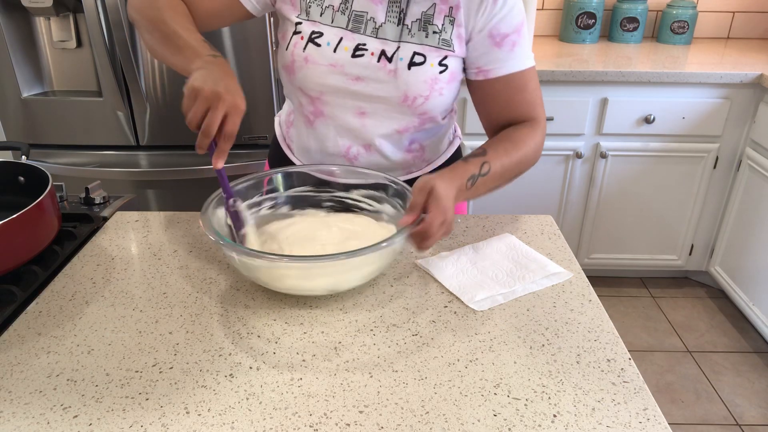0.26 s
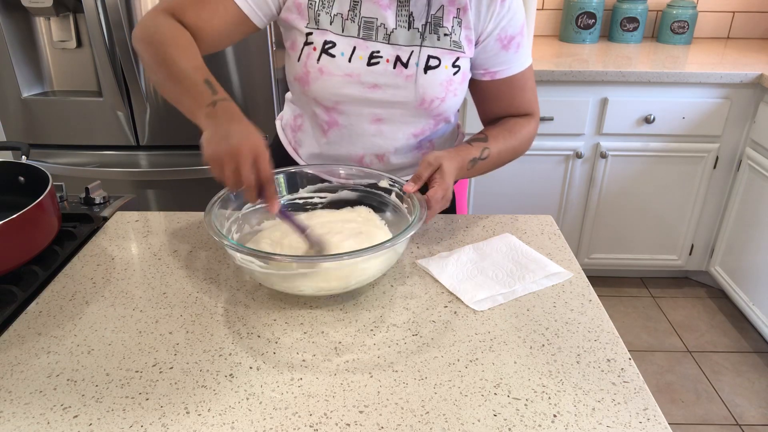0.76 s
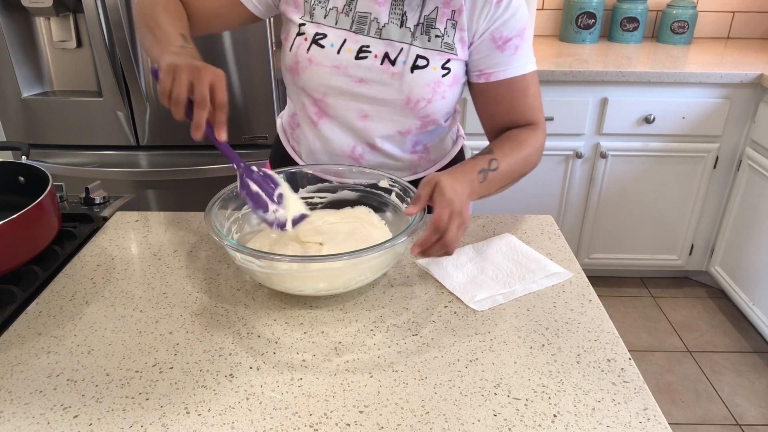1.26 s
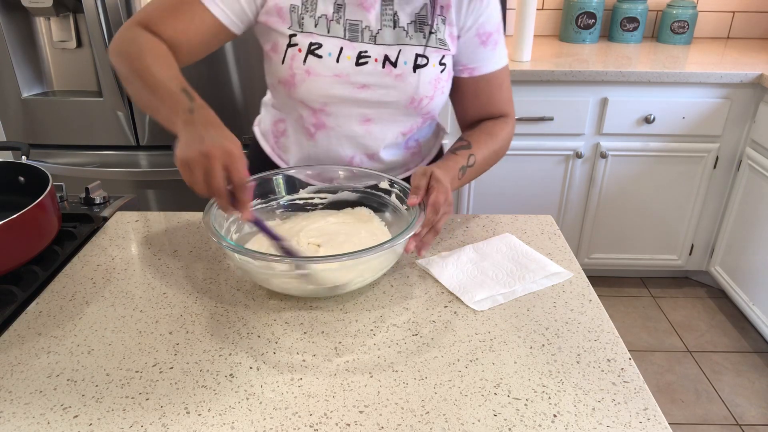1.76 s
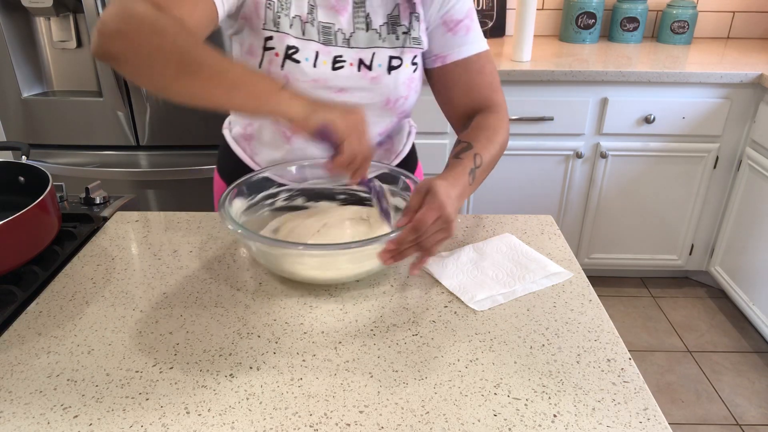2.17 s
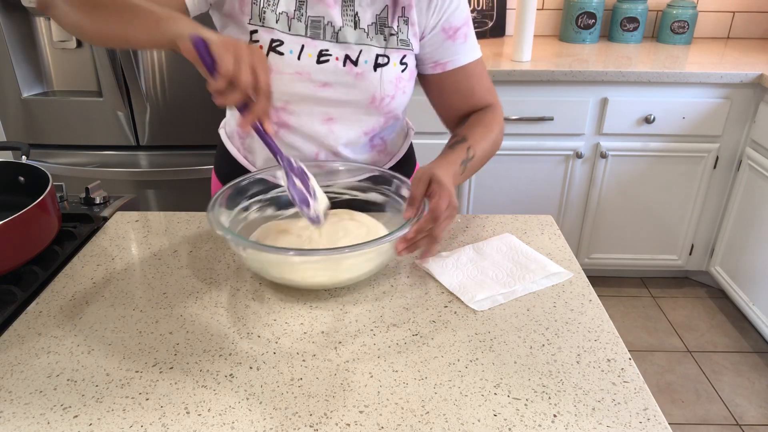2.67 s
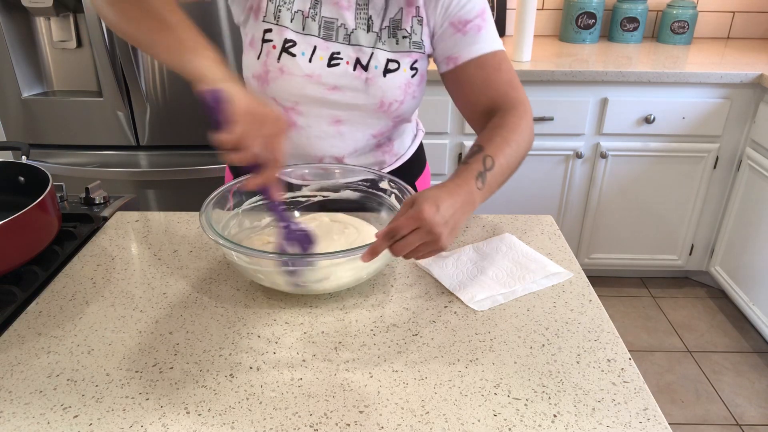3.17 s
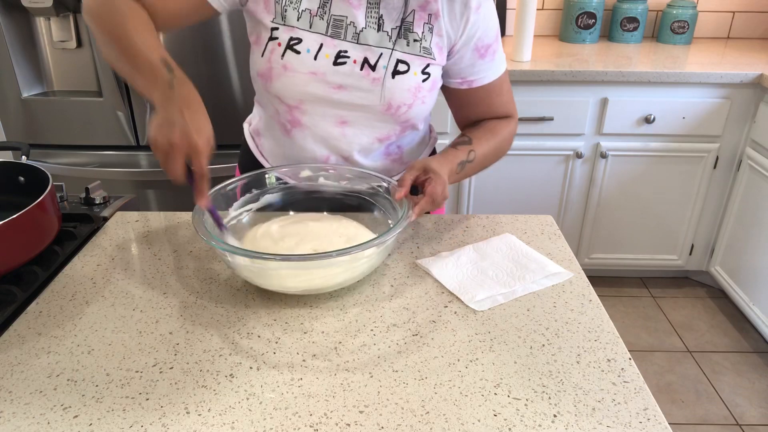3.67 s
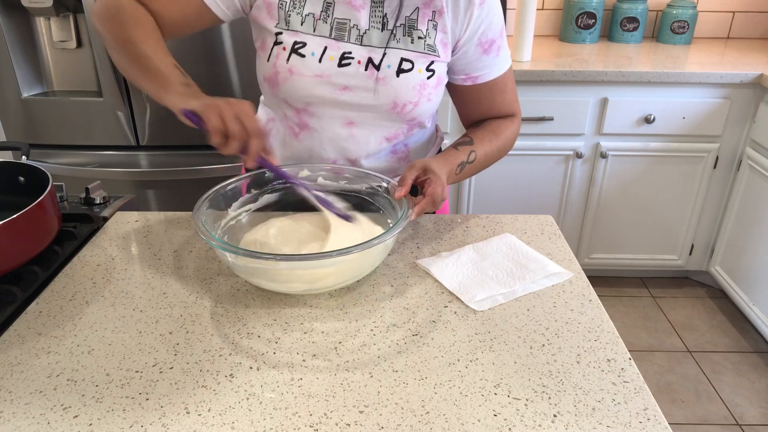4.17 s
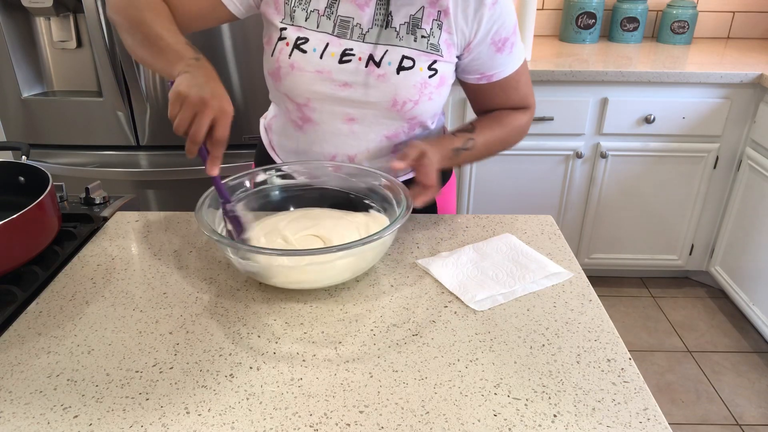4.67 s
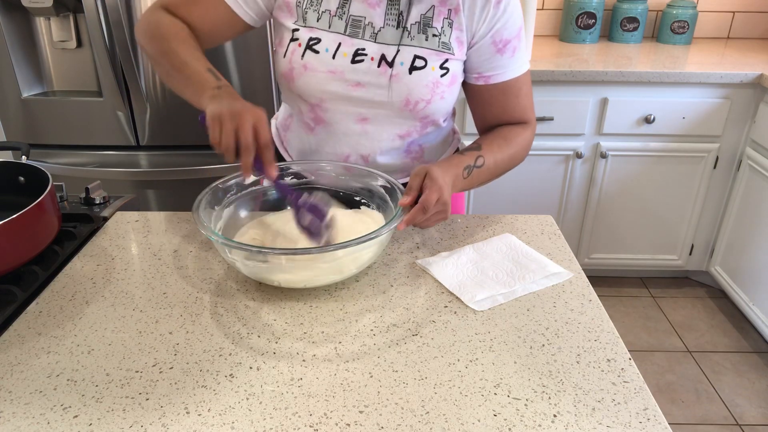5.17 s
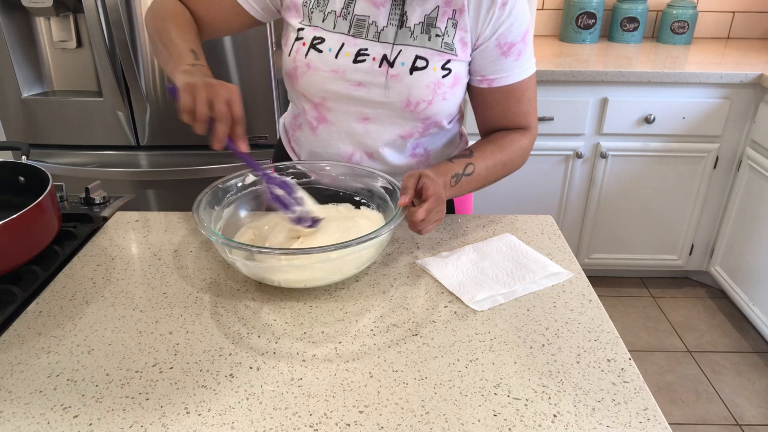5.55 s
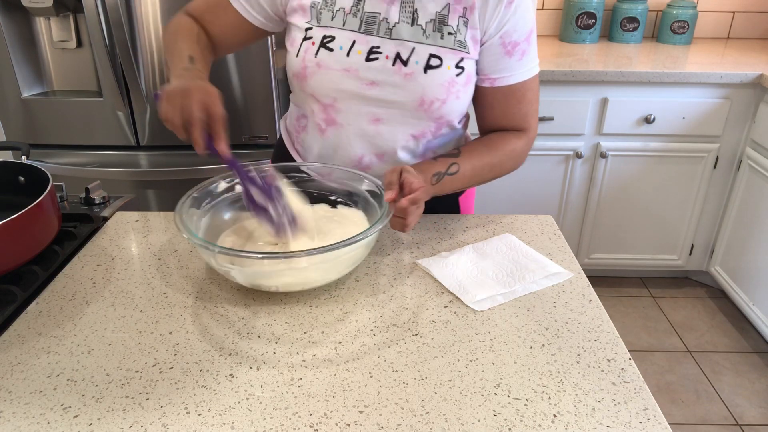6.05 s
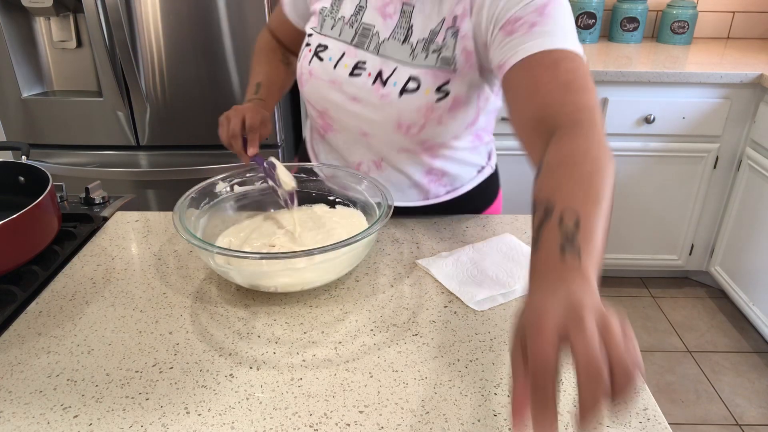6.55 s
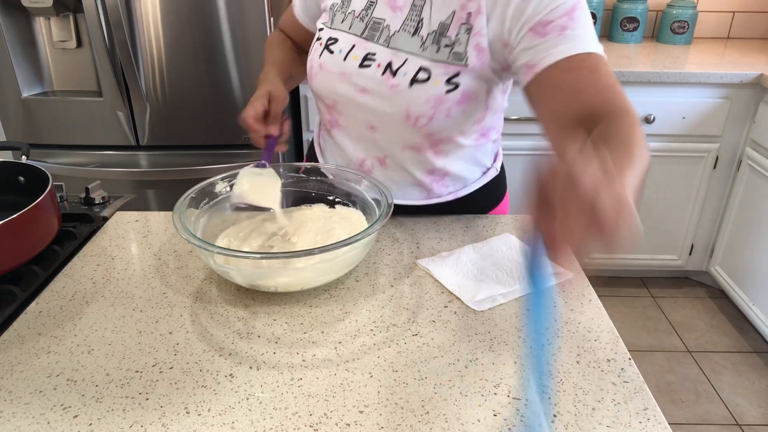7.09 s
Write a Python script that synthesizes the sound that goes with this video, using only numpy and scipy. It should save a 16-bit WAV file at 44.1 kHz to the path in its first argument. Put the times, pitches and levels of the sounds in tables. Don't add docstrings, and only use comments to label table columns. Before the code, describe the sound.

A quiet home kitchen with short, hard echoes and a low, wavering appliance hum, heard through a nearby phone microphone. At 0 to 0.15 s a rapid cluster of hollow glass-bowl knocks rattles on the stone counter, while a spatula drags stickily through thick batter with a faint squeak. Small taps follow to 0.5 s, then a double knock at 1.5 with a stronger fuzzy squeak. Soft strokes and faint rim pings come around 2, one firm knock at 2.6. From 2.8 to 3.8 tiny metal charms jingle, bright and shimmering, over a long rub. Quieter folding leads to a tight burst of knocks at 4.85 and another squeak near 5.1; a second motor hum fades by 5.6. Light knocks at 6.1 grow into heavy hollow thumps with glassy clacks at 6.45, 6.65 and 6.8. A soft last scrape closes, around 7.2.

```python
import sys
import numpy as np
from scipy import signal
from scipy.io import wavfile
from scipy.ndimage import uniform_filter1d

SR = 44100
rng = np.random.default_rng(int(sys.argv[2]) if len(sys.argv) > 2 else 0)


def field_ratio(decibels):
    return 10 ** (np.asarray(decibels, dtype=float) / 20)


def wrap_up_sound(samples):
    columns = np.atleast_2d(samples).T
    tamed = np.clip(columns, -1, 1)
    steps = np.round(tamed * 32767).astype(np.int16)
    wavfile.write(sys.argv[1], SR, steps)


N = 322812


def evened(x):
    return x / np.sqrt(np.mean(x ** 2) + 1e-20)


def read(points, hz):
    f, value = np.transpose(points)
    return np.interp(np.log(hz + 1), np.log(f + 1), value)


def drift(per_s):
    t = np.arange(0, N + 256, 256) / SR
    slow = np.zeros(len(t))
    for f in np.geomspace(.2, 1, 12) * per_s:
        slow += np.sin(2 * np.pi * (f * t + rng.random())) / np.sqrt(f)
    return np.interp(np.arange(N) / SR, t, evened(slow))


def noise(colour, patchy_db):
    hz = np.fft.rfftfreq(1024, 1 / SR)
    real, imaginary, patches = rng.standard_normal((N // 256 + 5, 513, 3)).T
    patches = uniform_filter1d(patches, size=10, axis=0)
    patches = evened(uniform_filter1d(patches, size=10, axis=1))
    level_db = read(colour, hz)[:, None] + patchy_db * patches
    spectra = (real + 1j * imaginary) * field_ratio(level_db)
    return evened(signal.istft(spectra, nperseg=1024, noverlap=768)[1][:N])


def struck(times, levels_db, modes, rise_s, scatter_db, tilt_db=0):
    t = np.arange(SR // 3) / SR
    out = np.zeros(N + SR)
    hz, db, t60 = np.transpose(modes)[:, :, None]
    rings = field_ratio(db - 60 * t / t60) * np.sin(2 * np.pi * hz * t) * (1 - np.exp(-t / rise_s)) ** 2
    strength, sign = rng.standard_normal((2, len(times), len(modes)))
    octaves = np.log2(hz / np.median(hz)).T
    level_db = np.reshape(levels_db, (-1, 1)) + np.reshape(tilt_db, (-1, 1)) * octaves
    weights = field_ratio(level_db + scatter_db * strength) * np.sign(sign) / np.linalg.norm(field_ratio(db))
    for s, sound in zip(times, weights @ rings):
        out[round(s * SR):][:len(t)] += sound
    return out[:N]


def crunch(times, levels_db, colour, t60, rise_s=0.0001):
    blows = np.zeros(N)
    blows[np.round(times * SR).astype(int)] = field_ratio(levels_db)
    t = np.arange(SR // 8) / SR
    envelope = field_ratio(-60 * t / t60) * (1 - np.exp(-t / rise_s))
    puffs = signal.oaconvolve(blows, envelope)[:N] * rng.standard_normal(N)
    log_gain = np.log(field_ratio(read(colour, abs(np.fft.fftfreq(4096, 1 / SR)))))
    phase = signal.hilbert(log_gain).imag
    taps = np.fft.ifft(np.exp(log_gain - 1j * phase)).real[:2048]
    return signal.oaconvolve(puffs, taps / np.linalg.norm(taps))[:N]


def fading(since, db, rise_s, db_per_s):
    since = np.maximum(since, 0)
    return field_ratio(db - db_per_s * since) * (1 - np.exp(-since / rise_s))


# t/s, body level/dB, counter thump level/dB, hardness/dB
BLOWS = [(0.005, -28.5, -36, -2), (0.017, -28.5, -42, -15), (0.082, -35, -44, -8), (0.097, -27.5, -47, -12),
         (0.143, -43, -35.5, 3), (0.279, -50, -66, 11), (0.409, -47, -60, -4), (0.494, -43.5, -42, -1),
         (1.49, -31.5, -47, 6), (1.561, -30, -43, 5), (2.624, -23.5, -36, -4), (4.607, -51, -53, 1),
         (4.846, -28.5, -41, -3), (4.857, -24, -36, -3), (4.874, -19, -61, 3), (4.898, -29, -46, -6),
         (6.069, -46, -43.5, 5), (6.117, -28, -46, -1.5), (6.139, -34.5, -43, -16), (6.278, -53, -46, 6),
         (6.455, -20, -31, 2.5), (6.484, -19, -33, -2.5), (6.634, -10, -30.5, 3.5), (6.654, -16, -35, 4),
         (6.81, -10, -25, 4), (6.829, -17, -41, -13)]
# t/s, thump level/dB
COUNTER_FLEXES = [
    (6.613, -17),
    (6.622, -30.5),
    (6.785, -14),
    (6.797, -28),
]
# f/Hz, level/dB, t60/s
BOWL_MODES = [(254.3, -5.5, 0.026), (328, -3.5, 0.032), (418.4, -1.5, 0.037), (455.7, -6.5, 0.057),
              (552, -1.5, 0.021), (626, -2.5, 0.049), (675, -1.5, 0.032), (802, -4, 0.045),
              (891.5, -3.5, 0.055), (1098, -4, 0.034), (1206, -7, 0.029), (1417, -9, 0.029)]
# f/Hz, level/dB, t60/s
COUNTER_MODES = [(89.3, -7.5, 0.21), (118.5, -3, 0.12), (141.6, -10, 0.17), (185, -6.5, 0.1),
                 (262, -2.5, 0.042)]
# f/Hz, level/dB per Hz
THUD_COLOUR = [(60, -63), (120, -1.5), (250, 8), (500, 5), (900, 7), (1300, -8), (2000, -19.5),
               (3000, -50.5)]
# t/s, level/dB, f/Hz, t60/s
RIM_TOUCHES = [(2.055, -55, 1870, .14), (2.04, -64, 2910, .1), (2.075, -56, 2910, .14),
               (2.12, -66, 5480, .08), (1.33, -66, 9950, .1), (2.47, -63, 10150, .1), (3.3, -66, 5270, .25),
               (3.655, -64, 5270, .2), (3.75, -64, 5270, .15), (1.9, -59, 1620, .2), (2.1, -70, 4150, .2)]


def bowl():
    s, body_db, thump_db, _ = np.transpose(BLOWS)
    tilt_db = 1.5 + 0.2696 * body_db
    out = struck(s, body_db + 3.5, BOWL_MODES, 0.0011, 1.83, tilt_db)
    out += crunch(s, body_db - 3.5, THUD_COLOUR, 0.03, 0.00093)
    out += struck(s, thump_db + 6, COUNTER_MODES, .0015, 1.5)
    s, flex_db = np.transpose(COUNTER_FLEXES)
    out += struck(s, flex_db, COUNTER_MODES, 0.0047, 1.4, tilt_db=-3.0)
    for s, db, hz, t60 in RIM_TOUCHES:
        out += struck([s], db, [(hz, 0, t60)], .003, 0)
    return out


# f/Hz, level/dB, t60/s
EDGE_MODES = [(1320, -3, .02), (1590, 0, .03), (1830, -6, .015), (2190, -7, .02)]
# f/Hz, level/dB per Hz
CRACK_COLOUR = [(600, -25), (1200, 0), (2000, -6), (3000, -13), (4200, -20), (6000, -40)]
# t/s, level/dB
GLASS_TICKS = [(.005, -71), (0.018, -70.5), (.279, -68), (.494, -71), (1.49, -71), (1.561, -69),
               (2.624, -69.5), (4.846, -63), (4.874, -51), (6.069, -67), (6.117, -73), (6.455, -55.5),
               (6.635, -43.5), (6.654, -60), (6.809, -41), (6.829, -57)]
# f/Hz, level/dB per Hz
TICK_COLOUR = [(3000, -17), (4600, -11), (5800, 4.5), (6600, -1), (10200, 0), (11500, -13), (12800, -32),
               (13600, -58)]


def glass_edge():
    s, body_db, _, hard_db = np.transpose(BLOWS)
    edge_db = body_db - 20.5 + hard_db
    edge = struck(s, edge_db + 8.5, EDGE_MODES, 0.00027, 3.1)
    edge += crunch(s, edge_db + 4.0, CRACK_COLOUR, 0.016)
    s, tick_db = np.transpose(GLASS_TICKS)
    tick = crunch(s, tick_db + 9.5, TICK_COLOUR, 0.034, 0.0013)
    return edge, tick


# f/Hz, t60/s
ROOM_DECAY = [(60, 0.26), (200, 0.31), (700, 0.48), (1500, 0.5), (3000, 0.61), (6000, 0.43), (11000, 0.27),
              (16000, 0.17)]


def kitchen(x):
    out = np.zeros(N)
    turn = np.arange(N) / SR * 1.7 * np.pi
    for k in range(3):
        echoes = np.zeros(SR)
        at = np.arange(160, SR - 20, 20) + rng.integers(0, 20, (SR - 161) // 20)
        echoes[at] = rng.choice([-1., 1.], len(at))
        hz, t, z = signal.stft(echoes, SR, nperseg=256)
        decay = field_ratio(-60 * t / read(ROOM_DECAY, hz)[:, None]) * (1.15 - np.exp(-t / 0.004))
        tail = signal.istft(z * decay, SR, nperseg=256)[1]
        share = np.cos(turn + k * np.pi / 3) * np.sqrt(2 / 3)
        out += signal.oaconvolve(x * share, tail / np.linalg.norm(tail))[:N]
    return out


# f/Hz, level/dB per Hz
AIR_COLOUR = [(45, 1.5), (75, -8.5), (110, 1), (800, -14.5), (3000, -25.5), (11500, -35), (14000, -54),
              (16000, -69)]
# f/Hz, rms level/dB, waver/dB
MOTOR_TONES = [
    (53.2, -48.6, .5),
    (120, -69, 3),
    (268, -75, 2.5),
    (840, -81, 2),
    (1085, -82, 2),
]
# t/s, f/Hz, level/dB
FAN_SPEED = [
    (0, 92, -59),
    (.5, 90.4, -54),
    (1.5, 91.04, -56),
    (2.5, 90.54, -57.5),
    (3.5, 92, -56),
    (4.6, 91, -65),
    (5.1, 89.3, -59.5),
    (5.6, 89, -78),
    (7.32, 86.6, -79),
]
# multiple of f, level/dB
FAN_HARMONICS = [(1, -4.5), (2, -6.5), (4, -18.5)]


def appliances():
    t = np.arange(N) / SR
    out = field_ratio(-58.5) * noise(AIR_COLOUR, 1.5)
    for hz, db, waver_db in MOTOR_TONES:
        level = np.sqrt(2) * field_ratio(db + waver_db * drift(5.2))
        out += level * np.sin(2 * np.pi * (hz * t + rng.random()))
    s, hz, db = np.transpose(FAN_SPEED)
    turns = np.cumsum(np.interp(t, s, hz)) / SR
    fan_db = np.interp(t, s, db)
    for order, order_db in FAN_HARMONICS:
        level = np.sqrt(2) * field_ratio(fan_db + order_db + 1.6 * drift(3))
        out += level * np.sin(2 * np.pi * order * turns)
    return out


# middle t/s, half length/s, batter drag level/dB, dry rustle level/dB
BLADE_STROKES = [(0.263, 0.35, -49.5, -73.5), (1.1, 0.58, -78, -96), (1.597, 0.18, -61, -90),
                 (1.957, 0.18, -49.5, -72), (2.092, 0.17, -54, -67), (2.593, .3, -51, -75),
                 (3.07, 0.31, -59.5, -71), (3.46, 0.28, -52.5, -74.5), (3.72, 0.52, -62, -72),
                 (4.51, 0.21, -53.5, -77.5), (5.146, 0.62, -66, -80), (5.894, 0.24, -60, -71.5),
                 (6.145, .25, -59, -69.5), (7.185, 0.14, -56, -66.5)]
# start t/s, level/dB, fade/dB per s
GLASS_SQUEAKS = [
    (.03, -60.5, 21),
    (1.45, -51.5, 27),
    (3.2, -54.5, 18),
    (5.08, -53.5, 29),
    (7.08, -62, 12),
]
# f/Hz, level/dB per Hz
BATTER_COLOUR = [(100, 5.5), (200, 1.5), (450, 4.5), (900, -2.5), (1600, -10), (2500, -18.5), (3500, -54),
                 (6000, -47)]
# f/Hz, level/dB per Hz
RUSTLE_COLOUR = [(1500, 0.5), (3000, 2), (6000, -0.5), (8000, -4), (10500, 0.5), (12000, -10), (14500, -20),
                 (16000, -40)]
# f/Hz, width/Hz, level/dB
SQUEAK_BANDS = [(4390, 110, 1.5), (4650, 250, -6), (5120, 200, -9)]


def spatula():
    t = np.arange(0, N + 64, 64)[:, None] / SR
    middle, half, batter_db, rustle_db = np.transpose(BLADE_STROKES)
    arch_db = -12.5 * ((t - middle) / half) ** 2
    s, body_db = np.transpose(BLOWS)[:2]
    slump = fading(t - s, body_db - 21.5, 0.018, 56.5)
    s, squeak_db, fade = np.transpose(GLASS_SQUEAKS)
    lift_db = 120 * np.maximum(t - s - 0.6, 0)
    contact = fading(t - s, squeak_db - lift_db, 0.13, fade)

    def total(gains):
        return np.interp(np.arange(N) / SR, t[:, 0], np.linalg.norm(gains, axis=1))

    batter = total(np.hstack([field_ratio(batter_db + arch_db), slump]))
    rustle = total(field_ratio(rustle_db + arch_db))
    squeak = total(contact)
    out = batter * field_ratio(-4 + 1.05 * drift(30)) * noise(BATTER_COLOUR, 2.3)
    out += rustle * field_ratio(4.0 + 1.1 * drift(40)) * noise(RUSTLE_COLOUR, 1.9)
    for hz, width, db in SQUEAK_BANDS:
        band = signal.butter(1, [hz - width / 2, hz + width / 2], "bandpass", fs=SR, output="sos")
        tone = evened(signal.sosfilt(band, rng.standard_normal(N)))
        out += squeak * field_ratio(db - 13.5 + 2.0 * drift(25)) * tone
    return out


# t/s, upper charm level/dB, middle charm level/dB, clatter level/dB
CHARM_TOUCHES = [(1.999, -57, -62, -60), (2.7744, -55, -56.5, -82), (2.8566, -52, -55, -66),
                 (2.9485, -48, -74, -54), (2.968, -37, -74, -75), (3.0747, -62, -45, -65),
                 (3.094, -38, -41, -71), (3.1116, -56, -47, -72), (3.1368, -46, -57, -75),
                 (3.2103, -45.5, -54.5, -63), (3.273, -51, -43.5, -64), (3.288, -52, -42, -74),
                 (3.433, -42, -52, -54), (3.453, -43, -46, -63), (3.49, -46, -58, -60),
                 (3.52, -60, -72, -66), (3.649, -50, -62, -59), (3.663, -43.5, -59, -62),
                 (3.7594, -69, -68, -62), (3.7948, -41, -48, -60.5), (4.9711, -53.5, -57, -70),
                 (5.524, -62, -67, -69), (5.55, -70, -75, -77), (6.942, -61, -60, -70)]
# t/s, level/dB
LOW_CHARM_TOUCHES = [
    (2.9485, -38),
    (2.9687, -38.5),
    (3.0754, -49.5),
    (3.4342, -64),
    (3.49, -66),
]
# f/Hz, level/dB, t60/s
UPPER_MODES = [(11270, -9, .06), (11330, 0, .09), (11400, -3, .11)]
# f/Hz, level/dB, t60/s
LOW_MODES = [(6500, 3.5, 0.02), (6630, -15, 0.088)]
# f/Hz, level/dB, t60/s
MIDDLE_MODES = [(8380, -11, .05), (8545, -5, .06), (8630, 0, .07), (8750, -10, .03)]
# f/Hz, level/dB, t60/s
OVERTONE_MODES = [(14130, -8, .14), (14900, -6, .1), (15260, 0, .2), (15420, -1.5, .16)]
# f/Hz, level/dB per Hz
CLATTER_COLOUR = [(2500, -4), (5000, -3), (7500, 7), (10000, 7.5), (11800, 4), (13000, -10), (15500, -14)]


def charms():
    s, upper_db, middle_db, clatter_db = np.transpose(CHARM_TOUCHES)
    out = struck(s, upper_db - 3.5, UPPER_MODES, 0.00038, 2.8)
    low_s, low_db = np.transpose(LOW_CHARM_TOUCHES)
    out += struck(low_s, low_db + 4.5, LOW_MODES, 0.0013, 0.83)
    out += struck(s, middle_db - 1.5, MIDDLE_MODES, 0.00095, 5.4)
    overtone_db = -76 + .6 * (middle_db + 37)
    out += struck(s, overtone_db + 16, OVERTONE_MODES, 0.0044, 2.6)
    return out + crunch(s, clatter_db + 1.5, CLATTER_COLOUR, 0.095, 0.0016)


def scene():
    knocks, jingle = bowl(), charms()
    edge, tick = glass_edge()
    to_room = field_ratio(-1.5) * (knocks + tick) + field_ratio(-4) * edge + field_ratio(2.5) * jingle
    direct = knocks + edge + tick + jingle
    return (direct + kitchen(to_room) + spatula() + appliances())[None]


def gated(x):
    hz, _, z = signal.stft(x, SR, nperseg=1024)
    tone = abs(z[:, (hz > 11200) & (hz < 11500)]).max(1, keepdims=True)
    above = ((hz > 11900) & (hz < 15000))[:, None]
    local = uniform_filter1d(uniform_filter1d(abs(z), size=16, axis=1), size=3, axis=2)
    z = np.where(above & (local < tone * field_ratio(-38)), 0, z)
    return signal.istft(z, SR, nperseg=1024)[1][:, :N]


def top_cut(x):
    return signal.sosfilt(signal.butter(12, 15710, fs=SR, output="sos"), x)


def record(dry):
    low_cut = signal.sosfilt(signal.butter(2, 42, "highpass", fs=SR, output="sos"), dry)
    squeezed = .65 * np.tanh(low_cut / .65)
    band_edge = signal.firwin(255, 15650, window=("kaiser", 9), fs=SR)
    mix = signal.oaconvolve(gated(squeezed), band_edge[None], "same")
    return top_cut(mix)


dry = scene()
out = record(dry)
wrap_up_sound(out)
```